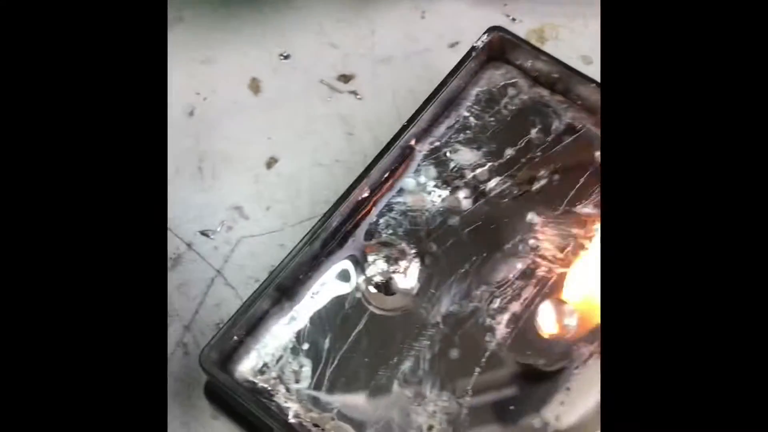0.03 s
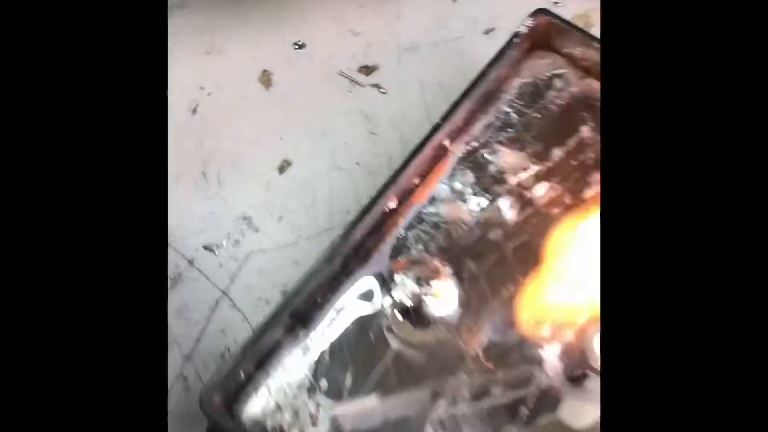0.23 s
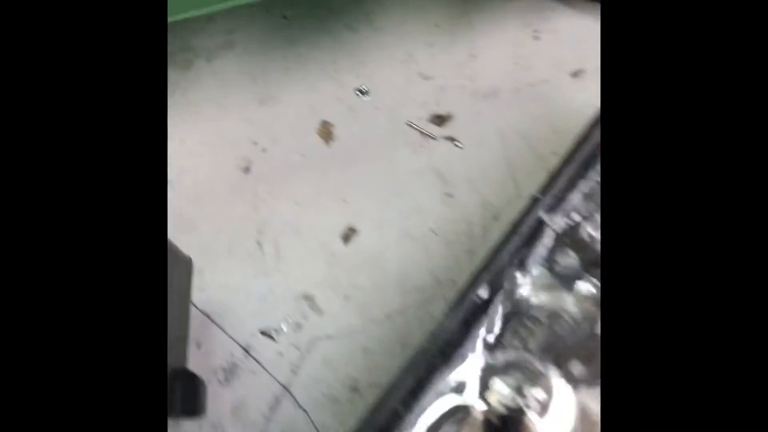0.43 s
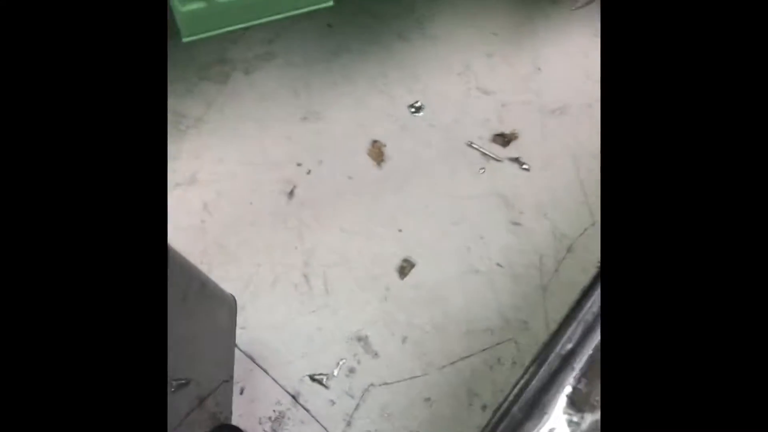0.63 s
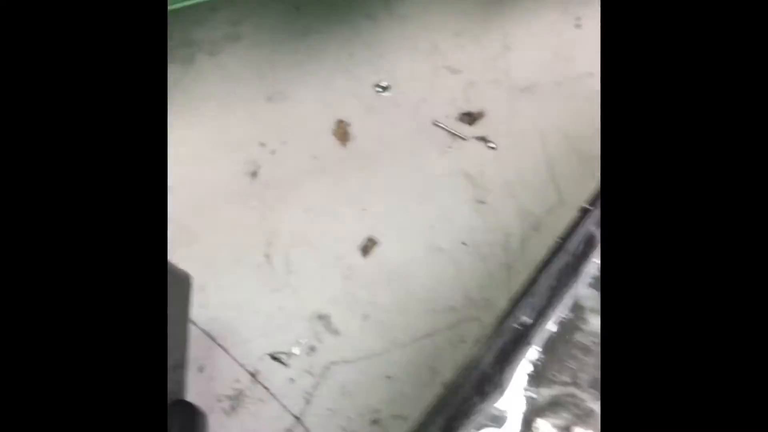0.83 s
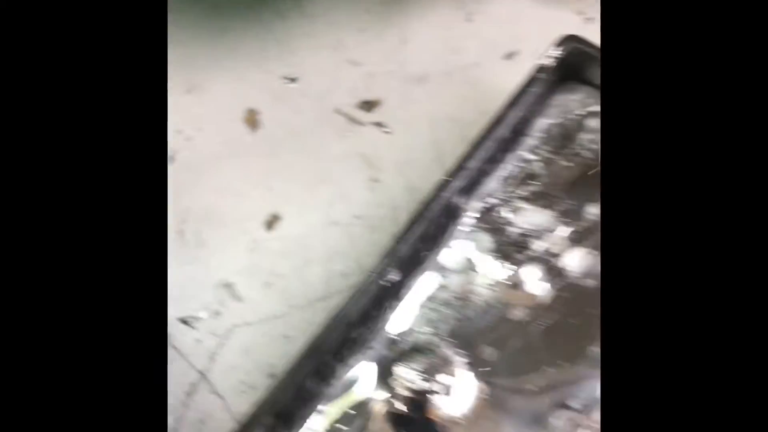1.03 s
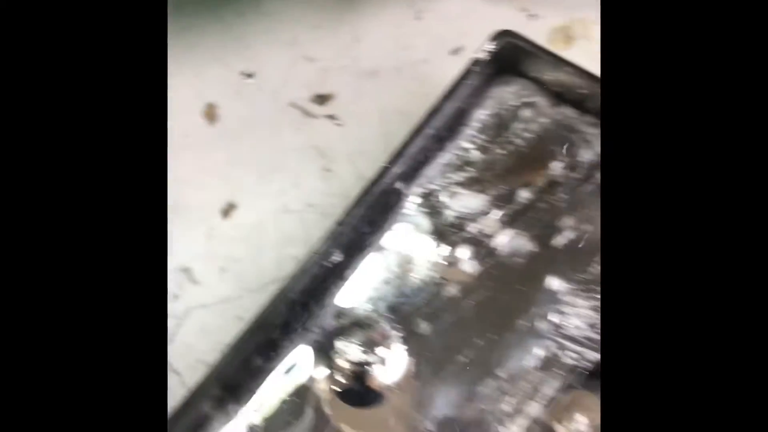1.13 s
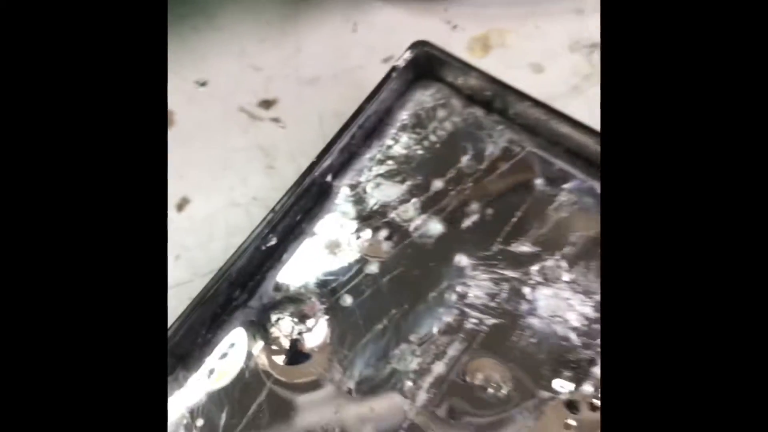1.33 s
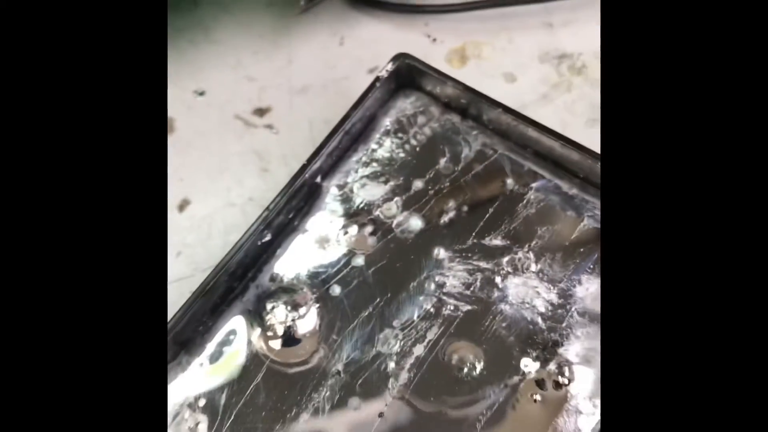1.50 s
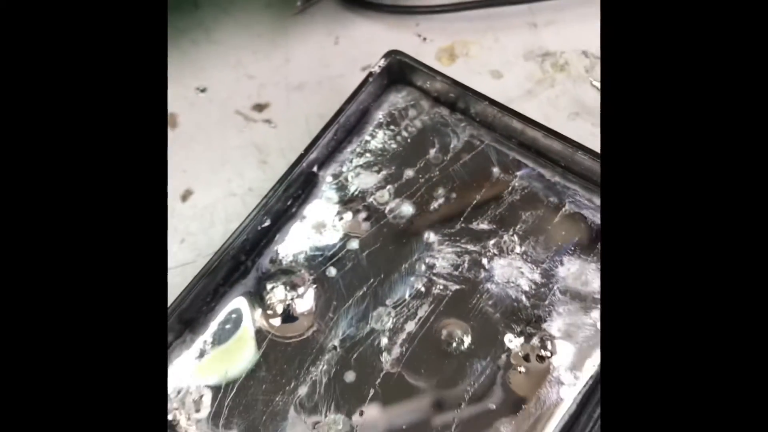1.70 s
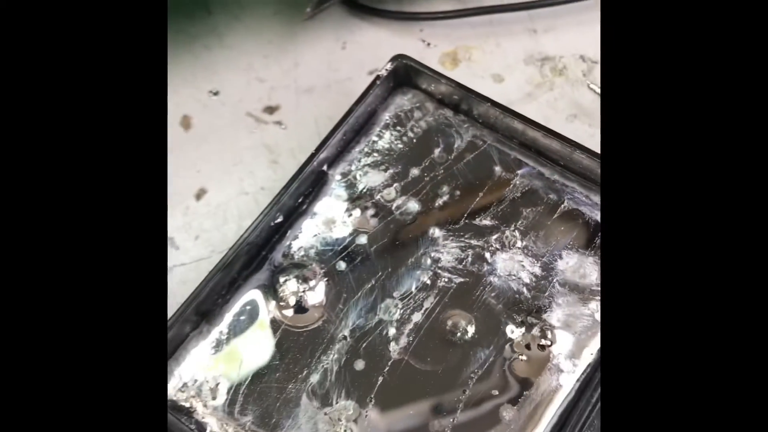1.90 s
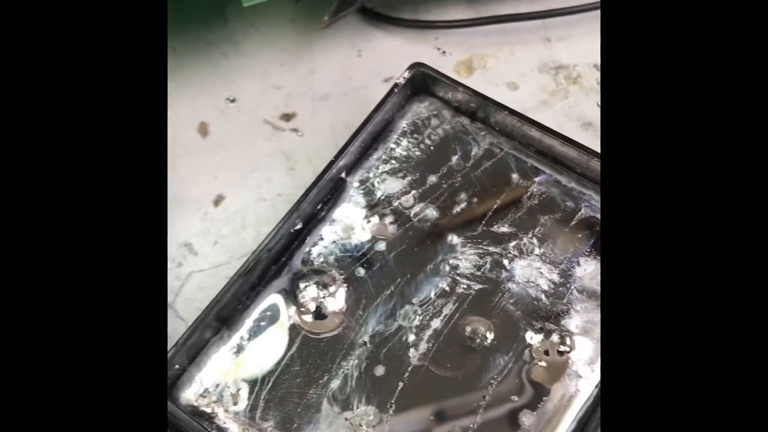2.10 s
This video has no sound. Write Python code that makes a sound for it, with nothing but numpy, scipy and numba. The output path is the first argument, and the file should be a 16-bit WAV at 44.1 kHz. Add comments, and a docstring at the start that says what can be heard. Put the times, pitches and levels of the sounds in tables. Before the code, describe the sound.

A soft thump, then liquid sizzles and pops on hot metal and fades, fan humming.

```python
"""At a workbench, alcohol flares with a low thump on a bath of molten solder, then boils off.
Each vapour bubble radiates an impulse as it bursts: thousands of tiny ones merge into a fizz
that swells and dies away, with a few spurts, while larger ones stand out as sharp pops.
A fan hums and hisses beside the bench. The sound is close and the same in both channels."""
import sys
import numpy as np
from scipy import signal
from scipy.fft import rfft, irfft
from scipy.io import wavfile
from scipy.ndimage import uniform_filter1d, map_coordinates
from numba import njit

SR = 44100
rng = np.random.default_rng(int(sys.argv[2]) if len(sys.argv) > 2 else 0)


def file_out(sig):
    """Save sig as 16-bit WAV at sys.argv[1]."""
    # one column per channel
    cols = np.atleast_2d(sig).T
    # limit, then scale
    lim = np.clip(cols, -1, 1)
    pcm = np.round(lim * 32767).astype(np.int16)
    wavfile.write(sys.argv[1], SR, pcm)


N = 94815


def undb(db):
    """Amplitude grows tenfold for every 20 dB."""
    return 10 ** (np.asarray(db) / 20)


def unit(x):
    """Normalisation to an rms of 1."""
    return x / np.sqrt(np.mean(x ** 2))


def noise():
    """Independent Gaussian samples have a white spectrum."""
    return rng.standard_normal(N)


def walk(per_s):
    """Smoothing random steps gives a slow fluctuation with a spread near 1."""
    hold = int(SR / per_s)
    steps = noise()[np.arange(N) // hold]
    return 1.306 * uniform_filter1d(uniform_filter1d(steps, hold), hold)


def curve(t, rows):
    """Linear interpolation through (time, value) rows."""
    return np.interp(t, *np.array(rows).T)


def colour(x, points):
    """Minimum-phase filtering through (Hz, dB) points."""
    hz, db = np.array(points).T
    bins_hz = np.maximum(np.arange(N + 1) * SR / (2 * N), 1)
    gain = undb(np.interp(np.log(bins_hz), np.log(hz), db))
    cepstrum = irfft(np.log(gain))
    cepstrum[1:N] *= 2  # folding onto positive time makes the filter causal
    cepstrum[N + 1:] = 0
    return irfft(rfft(x, 2 * N) * np.exp(rfft(cepstrum)))[:N]


@njit
def svf(x, hz, width):
    """Two integrators in a loop form a resonator whose centre can move."""
    y, band_state, low_state = np.empty(len(x)), 0., 0.
    for i in range(len(x)):
        g = np.tan(np.pi * hz[i] / SR)
        damping = np.pi * width / SR * (1 + g * g) / g
        v = (band_state + g * (x[i] - low_state)) / (1 + g * (g + damping))
        band_state = 2 * v - band_state
        low_state += 2 * g * v
        y[i] = damping * v
    return y


def band(x, hz, width):
    """A single resonance with a gain of 1 at its centre."""
    return svf(x, hz * np.ones(N), float(width))


def band_noise(hz, width):
    """Two resonators in series, each of this width, confine noise to a band; the rms is 1."""
    return unit(band(band(noise(), hz, width), hz, width))


def bursts(per_s, spread_db):
    """Shot noise: impulses at random moments, log-normal in size."""
    return (rng.random(N) < per_s / SR) * np.sign(noise()) * undb(spread_db * noise())


def swell(age, rise_s, fall_s):
    """A linear attack followed by exponential decay."""
    return np.clip(age / rise_s, 0, 1) * np.exp(-np.maximum(age - rise_s, 0) / fall_s)


def fan():
    """Periodic blade passage gives a wavering harmonic series; weaker tones stand beside it."""
    # Each row: multiple of the blade frequency, level in dB.
    harmonics = [(1, -46), (2, -49), (3, -59), (4, -57)]
    # Each row: frequency in Hz, level in dB.
    steady_tones = [(242, -58), (573, -63.5), (625, -63), (769, -53.5), (963, -59.5), (1535, -63.5)]
    blade_hz, wander, wavers_per_s = 336.9, 0.0022, 22
    cycles = np.cumsum(blade_hz * (1 + wander * walk(9.43))) / SR
    hum = np.zeros(N)
    for k, db in harmonics:
        level = undb(db + 1.2 * np.sqrt(k) * walk(wavers_per_s))
        hum += level * np.sin(2 * np.pi * (k * cycles + rng.random()))
    for hz, db in steady_tones:
        level = undb(db + 2 * walk(wavers_per_s))
        hum += level * np.sin(2 * np.pi * np.cumsum(hz + 3 * walk(14)) / SR)
    return np.sqrt(2) * hum


def air(t):
    """Moving air radiates broadband noise; narrow bands of hiss fade and return above it."""
    # Spectrum of the air in the room. Each row: frequency in Hz, relative density in dB.
    room_spectrum = [(30, -3.5), (44, 3.5), (70, -5), (110, -5), (160, -12.5), (230, -10.5), (290, -11),
                     (380, -10.5), (480, -12), (650, -8.5), (850, -7), (1120, -15), (1400, -11),
                     (2200, -21), (3600, -20.5), (5000, -25), (8600, -28.5), (10500, -30), (11500, -29.5),
                     (14000, -33), (16000, -42)]
    # Each row: centre in Hz, resonator width in Hz, early and late base levels in dB.
    hiss_bands = [(3122, 190, -49.5, -57.5), (5330, 300, -70, -72), (6460, 650, -63, -57.5),
                  (9090, 690, -58, -61), (11240, 440, -73, -68), (13600, 1200, -60, -58)]
    # Each row: time in seconds, gain in dB applied to all the bands.
    hiss_dip = [(.2, -1), (.42, -2), (1.05, -8), (1.25, 1), (2.1, -1)]
    room_db, early_to_late_s = -40, (0.068, 0.36)
    hiss = sum(undb(np.interp(t, early_to_late_s, [early, late])) * band_noise(hz, width)
               for hz, width, early, late in hiss_bands)
    return undb(room_db) * unit(colour(noise(), room_spectrum)) + undb(curve(t, hiss_dip)) * hiss


def flare(t):
    """Igniting vapour pushes the air into a damped swing that slows, with a rip and a brief rumble."""
    # Flame noise. Each row: start, rise and decay in seconds, level in dB,
    # centre and resonator width in Hz.
    flame_bands = [(.223, 0.0015, 0.0029, -27, 1920, 650), (0.2242, .002, 0.0046, -37, 4200, 3600),
                   (.2355, .001, .003, -37, 3600, 4000), (0.2211, 0.0058, 0.015, -27.5, 686, 750),
                   (.226, 0.0021, 0.017, -26, 204, 159), (.24, 0.028, 0.077, -36, 66.4, 55),
                   (.27, .025, .05, -43, 1330, 170)]
    ignition_s, thump_db = 0.2262, -9.5
    start_hz, end_hz, sag_s = 247, 44.7, 0.0056
    age = t - ignition_s
    hz = end_hz + (start_hz - end_hz) * np.exp(-np.maximum(age, 0) / sag_s)
    phase = 2 * np.pi * np.cumsum(hz * (age > 0)) / SR
    thump = -undb(thump_db) * swell(age, rise_s=0.0035, fall_s=0.0069) * np.sin(phase)
    return thump + sum(undb(db) * swell(t - start, rise, fall) * band_noise(centre, width)
                       for start, rise, fall, db, centre, width in flame_bands)


def fizz(t):
    """Tiny bursts add up to shot noise, shaped by drifting resonances and comb-filtered by an echo."""
    # Spectrum of the bursts. Each row: frequency in Hz, relative gain in dB.
    spectrum = [(500, -34), (1400, -13), (2500, -13), (4400, -9), (5600, -9), (6500, -7), (7800, -6),
                (9600, -3), (10450, -5.5), (11100, 0), (11700, -2), (13000, -1.5), (14300, -2),
                (16000, -4.5)]
    # Three resonances. Each row: time in seconds, low, middle and high centres in Hz, shared gain in dB.
    drift = [(.42, 5600, 9000, 12900, -4), (.57, 5680, 8650, 12400, 1), (.75, 5820, 8700, 12700, 3),
             (.88, 5930, 9150, 13100, -6), (1.0, 6400, 9050, 12300, 0), (1.14, 6640, 8450, 11500, -4),
             (1.38, 8000, 8150, 12000, -6.5), (1.65, 8300, 8550, 12600, -2)]
    # The same three, low to high. Each row: width in Hz, gain in dB added to the shared gain.
    resonances = [(520, 3), (800, 2.5), (520, -0.5)]
    # Reflection off the rim as the microphone moves. Each row: time in seconds, lag in milliseconds.
    rim_lag = [(.4, 0.77), (.78, 0.77), (1.1, 0.88), (1.3, 0.88), (1.42, 0.696), (1.8, 0.75)]
    # Course of the boiling. Each row: time in seconds, level in dB.
    boil_levels = [(.36, -68), (.396, -43), (.405, -33), (.47, -28), (.62, -27), (.73, -26), (.87, -26),
                   (1.08, -29), (1.2, -33), (1.42, -37.5), (1.6, -44.5), (1.8, -50.5), (2.15, -59)]
    # Short spurts of vapour. Each row: start in seconds, level in dB.
    spurts = [(0.305, -43.5), (0.366, -35), (.378, -38.5), (1.063, -31), (1.227, -25), (1.268, -32),
              (1.303, -29), (1.404, -34), (1.608, -34.5), (1.634, -40), (1.708, -43)]
    crackle_db, rim_db, flutter_db = 15, -11, 0.3
    crackle = undb(crackle_db) * bursts(per_s=60, spread_db=3.5)
    bubbles = colour(bursts(per_s=16000, spread_db=5) + crackle, spectrum)
    times, *columns = np.array(drift).T
    *centres, shared_db = (np.interp(t, times, column) for column in columns)
    ringing = sum(undb(db) * band(bubbles, hz, width) for hz, (width, db) in zip(centres, resonances))
    direct = bubbles + undb(shared_db) * ringing
    lag_s = curve(t, rim_lag) / 1000
    echo = undb(rim_db) * map_coordinates(direct, [(t - lag_s) * SR], order=5)
    boil_power = undb(curve(t, boil_levels) + flutter_db * walk(71)) ** 2
    spurt_power = sum((undb(db) * swell(t - start, rise_s=0.0026, fall_s=0.0086)) ** 2
                      for start, db in spurts)
    return unit(direct + echo) * np.sqrt(boil_power + spurt_power)  # incoherent sources add in power


def pops():
    """A larger bubble bursts as an impulse that rings briefly and scatters off the pot and the bench."""
    # Each row: start in seconds, impulse level in dB before filtering.
    large_bubbles = [(.3069, -28), (.4767, -14), (.5161, -17), (0.5313, -7), (.6682, -10), (0.7066, -13),
                     (0.7123, -11), (0.731, -4), (0.7368, -5), (0.751, -17), (.7795, -9), (0.8227, -6),
                     (.9521, -9), (.9724, -8), (1.065, -3.5), (1.0724, -12), (1.114, -12), (1.1432, -17),
                     (1.1905, -15), (1.2725, -15), (1.3089, -18), (1.4106, -15.5), (1.4517, -19),
                     (1.5172, -16), (1.676, -18), (1.6856, -23), (1.7328, -18), (1.741, -19), (1.7521, -19),
                     (1.7592, -21), (1.7806, -19)]
    # Spectrum of a pop. Each row: frequency in Hz, gain in dB.
    spectrum = [(600, -22), (2000, -13), (4000, -3), (6500, 3), (8800, 4.5), (10400, 2.5), (13000, 3.5),
                (16000, 2)]
    # Each pair: time constant of the scattering in seconds, energy in dB relative to the impulse.
    pot, bench = (0.00045, -6.5), (0.0035, -12)
    age = np.arange(SR // 25) / SR
    tail = sum(undb(db) * (age / tau) * np.exp(-age / tau) * np.sqrt(4 / (tau * SR))
               for tau, db in (pot, bench))
    impulses = np.zeros(2 * N)
    for start, db in large_bubbles:
        snap = tail * rng.choice([-1, 1], len(age))
        snap[0] = 1  # the direct sound
        onset = int(start * SR)
        impulses[onset:onset + len(age)] += undb(db) * snap
    snaps = colour(impulses[:N], spectrum)
    return snaps + band(snaps, hz=13200, width=2800)


def scene():
    """Superposition: the pressures of all sources add, equally in both channels."""
    t = np.arange(N) / SR
    return np.tile(fan() + air(t) + flare(t) + fizz(t) + pops(), (2, 1))


def record(dry):
    """Band limiting removes the deepest rumble and the highest treble."""
    low_hz, top_hz = 37.5, 15800
    lean = signal.sosfilt(signal.butter(4, low_hz, "high", fs=SR, output="sos"), dry)
    return signal.fftconvolve(lean, signal.firwin(511, top_hz, fs=SR)[None], "same")


dry = scene()
out = record(dry)
file_out(out)
```